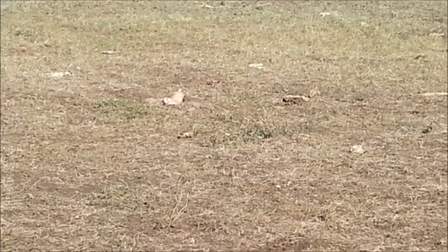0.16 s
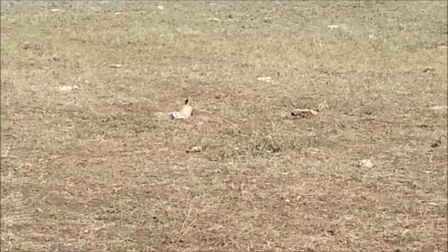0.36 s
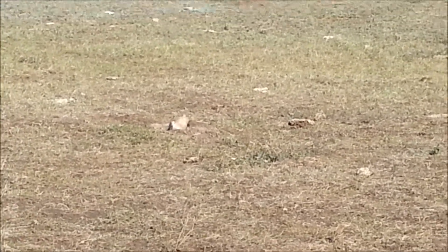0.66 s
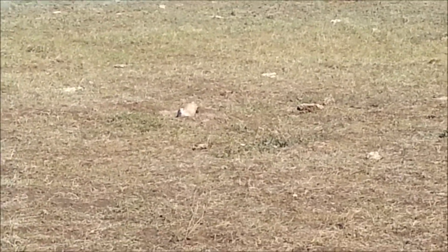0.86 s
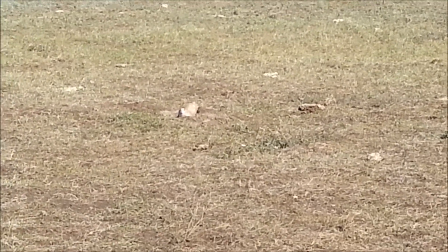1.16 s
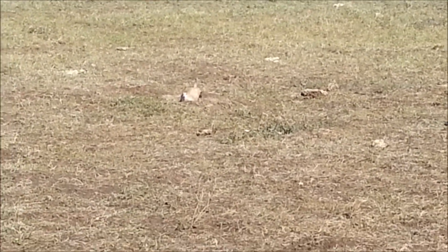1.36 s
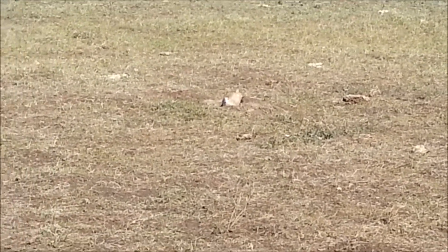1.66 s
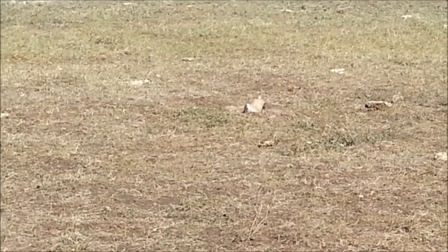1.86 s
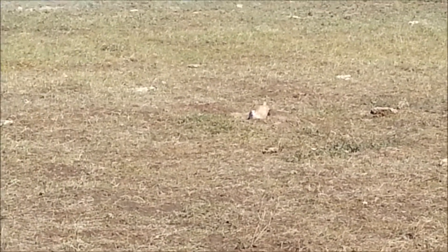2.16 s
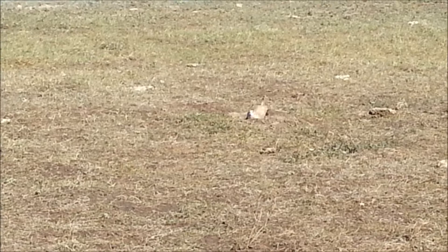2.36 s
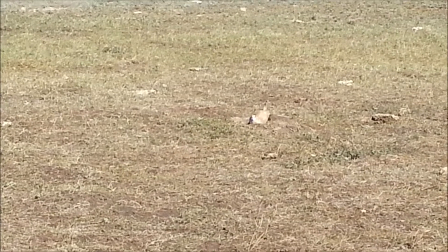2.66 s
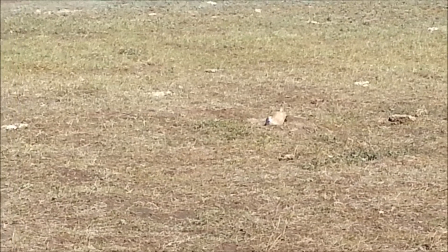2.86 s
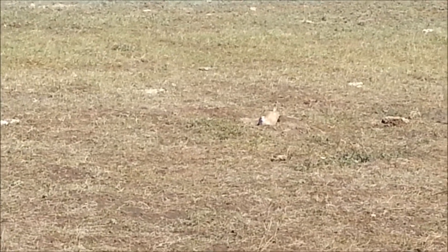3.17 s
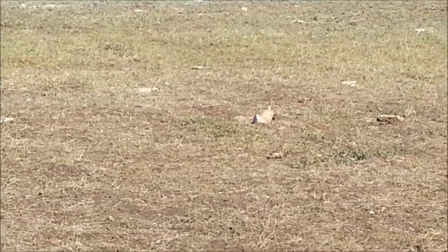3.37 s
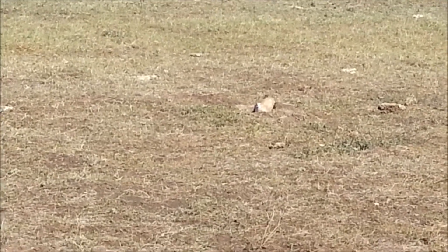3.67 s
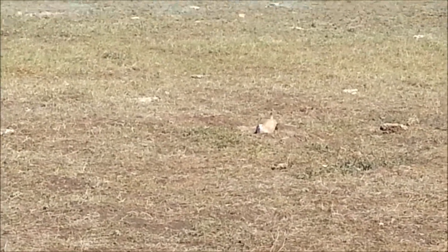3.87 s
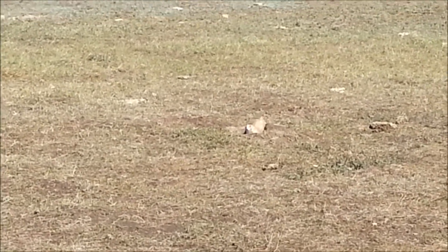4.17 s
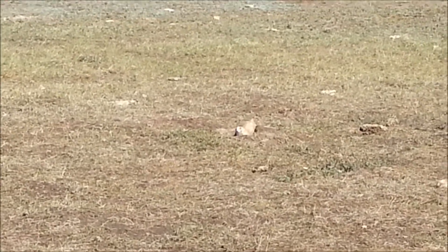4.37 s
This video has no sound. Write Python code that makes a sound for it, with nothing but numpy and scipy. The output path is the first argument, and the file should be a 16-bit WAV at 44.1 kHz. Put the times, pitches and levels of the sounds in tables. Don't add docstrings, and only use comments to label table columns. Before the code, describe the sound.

Faint, regular alarm barks from a distant prairie dog run the whole time. Over them come four loud, high barks from a nearer one, unevenly spaced, brighter on the left, cracking into a raspy double tone. The outdoor air is open and nearly echoless; wind puffs, plastic ticks from the hand-held device and light dry rustling surround the calls, over steady hiss.

```python
import sys
import numpy as np
from scipy import signal
from scipy.io import wavfile
from scipy.ndimage import uniform_filter1d

SR = 44100
rng = np.random.default_rng(int(sys.argv[2]) if len(sys.argv) > 2 else 0)


def volts(x):
    e = np.asarray(x, float) / 20
    return 10 ** e


def transcribe(signal):
    frames = np.atleast_2d(signal).T
    limited = np.clip(frames, -1, 1)
    pcm = np.round(limited * 32767).astype(np.int16)
    wavfile.write(sys.argv[1], SR, pcm)


N = 198869

# [f/Hz, level/dB]
HOUSING_SHADOW = [(900, -3.5), (1650, -5.5), (2000, -0.5), (3500, -12), (4000, -10.5), (6000, -16.5),
                  (9000, -2)]


def at_hz(points, hz):
    table = np.array(points)
    return np.interp(np.log(hz), np.log(table[:, 0]), table[:, 1])


def rms_one(x):
    return x / np.sqrt(np.mean(x ** 2) + 1e-20)


def drift(rate_hz, size):
    r = np.exp(-2 * np.pi * rate_hz / SR)
    run_in = int(SR / rate_hz)
    noise = rng.standard_normal(size + run_in)
    return rms_one(signal.lfilter([1], [1, -2 * r, r * r], noise)[run_in:])


def bandpass(x, low_hz, high_hz, order=2):
    return signal.sosfilt(signal.butter(order, [low_hz, high_hz], "band", fs=SR, output="sos"), x)


def span(rows):
    s, *columns = np.transpose(rows)
    at = np.arange(int(s[0] * SR), min(int(s[-1] * SR), N))
    return at, [uniform_filter1d(np.interp(at / SR, s, column), size=45) for column in columns]


def line(hz, level_db, shadow=HOUSING_SHADOW, turn=None):
    start_turn = rng.random() if turn is None else turn
    phase = 2 * np.pi * (np.cumsum(hz) / SR + start_turn)
    count = np.arange(len(hz))
    fade = np.minimum(1, np.minimum(count, count[::-1]) / 40)
    left = np.sin(phase)
    right = volts(at_hz(shadow, hz)) * np.sin(phase + 1.0 - 0.00017 * hz)
    return np.sqrt(2) * fade * volts(level_db) * np.array([left, right])


def banded_noise(spectrum, edges, patchy_db, rate):
    # [f/Hz, correlation 0-1]
    likeness = [(200, 0.086), (1200, 0.13), (4000, 0.016), (9000, 0.0075)]
    out, together = 0, drift(rate, N)
    white = rng.standard_normal((2, 2, N))
    for k, (low, high) in enumerate(zip(edges, edges[1:])):
        mid, side = bandpass(white[k % 2], low, high)
        hz = np.sqrt(low * high)
        alike = np.clip(at_hz(likeness, hz), 0, 1)
        flicker_db = patchy_db * (.7 * together + drift(rate, N))
        gain = volts(at_hz(spectrum, hz) + flicker_db)
        out = out + gain * (np.sqrt(1 + alike) * mid + np.sqrt(1 - alike) * side * [[1], [-1]])
    return rms_one(out)


def wind():
    # [t/s, left level/dB, right level/dB]
    gust = [(0.0, -62, -55.5), (0.35, -65.5, -59), (0.88, -55, -58), (2.46, -58.5, -61.5), (3.49, -54, -58),
            (4.51, -61, -59.5)]
    # [f/Hz, level per Hz/dB]
    left_colour = [(25, -32), (50, -46), (90, -4.5), (200, 3.5), (320, -5), (500, -13), (900, -61)]
    # [f/Hz, level per Hz/dB]
    right_colour = [(25, -10.5), (60, -9), (110, 2.5), (200, -9), (400, -11), (900, -32)]
    # [t/s, peak level/dB, f/Hz, length/ms]
    strong_puffs = [(.6696, -24, 298, 4.1), (.679, -22, 324, 4.2), (.6919, -32.5, 246, 16),
                    (.7315, -36, 292, 8), (.7475, -35, 273, 9.1), (.8193, -34.5, 243, 7),
                    (.8386, -32.5, 330, 4.2), (.9956, -39, 275, 2), (1.009, -27.5, 314, 5.8),
                    (1.0573, -26, 325, 6.7), (1.0722, -33, 265, 4.4), (1.0904, -35, 265, 7.5),
                    (1.1065, -33, 210, 6.7), (1.3014, -32, 300, 4.2), (1.3107, -29, 250, 7.3),
                    (1.5747, -34, 296, 4.4), (1.6535, -24.5, 420, 4.3), (1.7759, -32.5, 275, 7.4),
                    (1.9035, -31.5, 299, 3.7), (2.2153, -38.5, 248, 15), (2.3129, -33, 278, 7.2),
                    (2.9996, -33.5, 247, 4), (3.0149, -31.5, 226, 7), (3.3444, -36, 309, 4.9),
                    (3.3704, -31, 237, 4), (3.3793, -31, 258, 9.8), (3.3912, -27, 340, 3.7),
                    (3.3987, -28, 255, 9), (3.4175, -39.5, 305, 24), (3.8117, -33.5, 210, 10)]
    s, left_db, right_db = np.transpose(gust)
    t, edges = np.arange(N) / SR, 20 * 2 ** np.arange(0, 6, .5)
    left = volts(np.interp(t, s, left_db) + 5) * banded_noise(left_colour, edges, patchy_db=2.5, rate=25.0)[0]
    right = volts(np.interp(t, s, right_db)) * banded_noise(right_colour, edges, patchy_db=1.5, rate=15.0)[1]

    weak_puffs = []
    for chance, a, b in rng.random((26, 3)):
        when = .7 + 3.4 * chance
        peak_db = np.interp(when, s, left_db) + 15 + 4 * a
        weak_puffs.append((when, peak_db, 265 * (0.77 + 0.44 * b), 3.5))

    near, thumps = np.arange(-700, 700), np.zeros(N)
    for when, peak_db, hz, ms in [*strong_puffs, *weak_puffs]:
        bell = np.exp(-np.log(16) * (near / SR / (ms * 0.00068)) ** 2)
        cycle = np.cos(2 * np.pi * (hz * near / SR + rng.random()))
        thumps[int(when * SR) + near] += volts(peak_db) * bell * cycle
    thumps = signal.sosfilt(signal.butter(2, 90, "high", fs=SR, output="sos"), thumps)
    return np.array([left + thumps, right])


def air():
    # [f/Hz, level per Hz/dB]
    colour = [(290, -10), (500, -0.5), (990, -0.5), (1880, -3.5), (3370, -4.5), (6300, -14), (7060, -11),
              (14000, -10.5)]
    # [t/s, level/dB]
    bed = [(0.0, -62.5), (3.95, -61), (4.51, -62)]
    s, level_db = np.transpose(bed)
    hiss = banded_noise(colour, np.geomspace(350, 16000, 15), patchy_db=.3, rate=4.0)
    return volts(np.interp(np.arange(N) / SR, s, level_db) + 5.0) * hiss * volts([[.15], [-.15]])


def ticks():
    # [t/s, ring level/dB, ring
    # f/Hz, crack level/dB]
    knocks = [(0.0792, -52, 895, -59), (0.1193, -44, 900, -44), (0.293, -63, 1910, -37.5),
              (.5752, -41.5, 940, -48), (.9662, -55, 1240, -60), (0.9827, -49, 1720, -49),
              (.9934, -46, 1390, -36), (1.0418, -60, 1780, -49), (1.079, -54, 2200, -51),
              (1.094, -52, 1020, -31.5), (1.101, -47.5, 990, -43), (1.1402, -53, 2060, -43),
              (1.9223, -55, 990, -58), (1.9525, -52, 875, -56), (1.9862, -51, 860, -52),
              (2.0154, -53, 840, -61), (2.2313, -50, 930, -63), (2.5486, -44, 1260, -41),
              (2.7159, -67, 1550, -36), (2.9525, -47, 830, -36.5), (3.229, -50, 1020, -38),
              (3.2448, -33, 1025, -26.5), (3.2499, -42, 1050, -42), (3.2571, -31, 1070, -26),
              (3.2605, -44, 1030, -30), (3.3285, -56, 1220, -57), (4.0278, -59, 1900, -40),
              (4.311, -58, 1900, -36.5), (4.324, -54, 2500, -45), (4.447, -50, 730, -56)]
    out, t = np.zeros((2, N)), np.arange(900) / SR
    snap = bandpass(np.exp(-t / .00009), 1000, 4600, order=3)
    snap /= np.abs(snap).max()
    ring_shape = np.exp(-t / .002) * (1 - np.exp(-t / .0002))
    for when, ring_db, hz, crack_db in knocks:
        pan_db = 8 * np.log2(hz / 850)
        turn = 2 * np.pi * hz * t
        ring = np.sin(turn) - 0.39 * np.sin(1.67 * turn) + 0.37 * np.sin(0.71 * turn)
        at = slice(int(when * SR), int(when * SR) + 900)
        out[:, at] += volts(ring_db + 5.5) * ring * ring_shape * volts([[pan_db / 2], [-pan_db / 2]])
        out[:, at] += volts(crack_db - 1) * snap * volts([[0], [-7]])
    return out


def far_calls():
    # [start t/s, top of 2nd partial f/Hz, its level/dB, fundamental level/dB,
    #            second oscillator re each/dB]
    calls = [(.092, 3090, -53, -57, -3), (.478, 3080, -54, -58, -8), (.841, 3110, -51, -56, -2),
             (1.227, 3150, -52, -56, -4), (1.586, 3110, -51, -57, -2), (1.962, 3010, -54, -61, -14),
             (2.36, 2900, -60, -66, -14), (2.721, 3090, -53, -57, -4), (3.058, 3110, -50, -57, -4),
             (3.462, 3200, -47, -56, -3), (3.851, 2970, -50, -62, -18), (4.226, 3130, -51, -58, -4)]
    # [share of length, pitch re top, level/dB]
    arch = [(0, .92, -16), (.12, .97, -5), (.28, 1.0, -1), (.55, .965, -3.5), (.85, .91, -6), (1, .88, -18)]
    # [f/Hz, level/dB]
    far_shadow = [(1500, -5), (3000, -7)]
    out, length_s = np.zeros((2, N)), .043
    part, pitch, swell_db = np.transpose(arch)
    for start, top_hz, top_db, low_db, beat_db in calls:
        at, (hz, shape_db) = span(np.transpose([start + length_s * part, top_hz * pitch, swell_db]))
        size = len(at)
        share = np.clip(np.linspace(-1.2, 3.5, size), 0, 1) * np.clip(np.linspace(5.0, 0, size), 0, 1)
        hz = hz * (1 + .01 * drift(250, size))
        beat = 350 * (1 + .08 * drift(80, size))
        for tone_hz, tone_db in ((hz, top_db + shape_db), (hz / 2, low_db + 0.5 + shape_db)):
            second_db = tone_db + beat_db + 3.0 * drift(120, size)
            out[:, at] += line(tone_hz, tone_db + 2.5 * drift(120, size), far_shadow)
            out[:, at] += share * line(tone_hz + beat, second_db, far_shadow)
    return out


def bark_controls(start, length, top_hz, level_db, breaks, end_hz, bend, burst):
    # [f/Hz, level/dB]
    mouth = [(1880, -38), (2040, -27.5), (3500, -28), (4030, -27.5), (4200, -40.5), (5450, -60),
             (5850, -31.5), (6100, -30)]
    split_loss_db = [2, 0, 0]
    tail_s = .008
    at = np.arange(int(start * SR), int((start + length + tail_s) * SR))
    t, top = at / SR - start, .62 * breaks

    set_in_hz = 1775
    rise = set_in_hz + (top_hz - set_in_hz) * np.sin(np.pi / 2 * np.clip(t / top, 0, 1))
    hz = rise - (top_hz - end_hz) * np.clip((t - top) / (length - top), 0, 1) ** bend

    onset_db = -24 * np.clip(1 - t / .0022, 0, 1) ** 2
    swell_db = 5.5 * (t / length - .5)
    surge_db = 1.5 * np.exp(-np.abs(length - t) / 0.0031)
    release_db = 4600 * np.maximum(t - length, 0)
    effort_db = level_db + onset_db + swell_db + surge_db - release_db

    settling = burst * (.45 + (1 - .45) * np.exp(-np.maximum(t - breaks, 0) / .012))
    share = np.clip((t - breaks) / .002 + 1, 0.088, 1) * settling
    levels_db = [effort_db + at_hz(mouth, (k + 1) * hz) - loss_db * share
                 for k, loss_db in enumerate(split_loss_db)]
    return at, (hz, *levels_db, share)


def near_barks():
    # [start t/s, length/s, top pitch f/Hz, level/dB, voice break after start t/s]
    barks = [
        (.5203, .0440, 2090, -1.5, .0247),
        (1.4843, .0435, 2040, 1.2, .0262),
        (2.3078, .0420, 1980, -.3, .0197),
        (3.7193, .0410, 1960, 0, .0172),
    ]
    # [oscillator gap f/Hz, end pitch f/Hz, bend of the sag, second oscillator share 0-1]
    voices = [(330, 1740, 1.8, .5), (361, 1700, 1.2, .9), (359, 1730, 1.1, .8), (340, 1710, 1.05, .8)]
    partial_turn = [0, .63, .86]
    # [partial number, level re a base that follows the 3rd partial only weakly/dB]
    upper = [(4, -22.5), (5, -32), (6, -34.5), (7, -49)]
    # [partial number, beat multiple, level re that partial/dB]
    side_lines = [(1, 1, -5.5), (1, -1, -10.5), (2, 1, -8.5), (2, -1, -15), (2, 2, -19), (2, -2, -23.5),
                  (3, 1, 1), (3, -1, -16), (3, 2, -50), (3, 3, -12.5)]
    out = np.zeros((2, N))
    for bark, (beat_hz, *voice) in zip(barks, voices):
        at, (hz, *levels_db, share) = bark_controls(*bark, *voice)
        size = len(at)
        share = np.clip(share, 1e-3, 1)
        hz = hz * (1 + .009 * share * drift(300, size))
        beat = beat_hz * (1 + .07 * drift(70, size))
        for k, level_db in enumerate(levels_db):
            wobble_db = 1.5 * share * drift(300, size)
            out[:, at] += line((k + 1) * hz, level_db + wobble_db, turn=partial_turn[k])
        for k, rel_db in upper:
            shaky = 1 + (.008 * (k - 3.5) + .035 * share) * drift(400, size)
            upper_db = 0.21 * levels_db[2] - 22.5 + rel_db + 2.4 * drift(78, size)
            out[:, at] += line(k * hz * shaky, upper_db)

        held = [levels_db[0], levels_db[1], np.maximum(levels_db[2], levels_db[1] - 8)]
        for k, m, rel_db in side_lines:
            side_db = held[k - 1] + rel_db + 2.5 * drift(150, size)
            out[:, at] += share * line(k * hz + m * beat, side_db)

        noise = rng.standard_normal((2, size))
        rasp = bandpass(noise, 2800, 8200)
        breath = bandpass(noise, 9500, 14500)
        breath_db = levels_db[1] - 17.5 + 2 * drift(80, size)
        out[:, at] += share * volts(levels_db[1] - 17) * rasp * volts([[0], [-8]])
        out[:, at] += share * volts(breath_db) * breath * volts([[0], [-6]])
    return out


def indrawn_notes():
    # [start t/s, length/s, pitch f/Hz, fundamental level/dB, throat level/dB]
    notes_in = [
        (.570, .02, 940, -49, -86),
        (1.537, .025, 970, -45, -76),
        (1.602, .02, 960, -49, -90),
        (2.36, .03, 980, -43, -71),
        (3.773, .014, 930, -49, -90),
        (3.817, .022, 960, -54, -86),
    ]
    # [partial number, level/dB]
    throat = [(3, 1), (4, -5), (5, 3), (7, -7)]
    out = np.zeros((2, N))
    for start, length, note_hz, note_db, rasp_db in notes_in:
        t = length * np.array([0, .3, 1])
        at, (hz, shape_db) = span(np.transpose([start + t, note_hz - 2500 * t, [-6, 0, -15]]))
        size = len(at)
        out[:, at] += line(hz * (1 + .015 * drift(200, size)), note_db + shape_db + 1)
        for k, rel_db in throat:
            shaky = 1 + .045 * drift(250, size)
            throat_db = rasp_db + shape_db + 14 + rel_db + 1.3 * drift(230, size)
            out[:, at] += line(k * hz * shaky, throat_db)
    return out


def distant_whistles():
    # [t/s, f/Hz, level/dB]
    glides = [
        [(.628, 1350, -68), (.64, 1100, -60), (.656, 800, -67)],
        [(4.39, 1550, -78), (4.41, 1750, -67), (4.435, 2080, -68), (4.48, 2130, -66), (4.51, 2050, -70)],
    ]
    # [f/Hz, level/dB]
    whistle_shadow = [(800, 8), (2000, -6)]
    out = np.zeros((2, N))
    for rows in glides:
        at, (hz, level_db) = span(rows)
        out[:, at] += line(hz, level_db + 2.5 * drift(60, len(at)), whistle_shadow)
    return out


def rustle():
    # [t/s, hold/s, level/dB]
    strokes = [
        (.985, .115, -55),
        (3.262, .048, -55.5),
        (3.39, .02, -61),
        (4.325, .003, -61),
    ]
    # [f/Hz, level per Hz/dB]
    grass = [(700, 4), (1500, -0.5), (3500, -2.5), (5000, -11), (7000, -20)]
    sizes = volts(2.5 * np.minimum(rng.exponential(1, N), 4)) * rng.choice([-1, 1], N)
    born = rng.random(N) < 3000 / SR
    stem = rng.integers(0, 16, N)
    grains = np.zeros(N)
    for k, hz in enumerate(np.geomspace(800, 7000, 16)):
        r, w = volts(-60 * hz / (9.0 * SR)), 2 * np.pi * hz / SR
        hits = sizes * born * (stem == k) + 1e-18
        ring = signal.lfilter([0, np.sin(w)], [1, -2 * r * np.cos(w), r * r], hits)
        grains += volts(at_hz(grass, hz)) * np.sqrt(hz) * rms_one(ring)
    grains, out = rms_one(grains), np.zeros(N)
    for s, hold, db in strokes:
        edge_db = db - 15
        at, (level_db,) = span([(s - .025, edge_db), (s, db), (s + hold, db), (s + hold + .05, edge_db)])
        out[at] += volts(level_db + 1.5 * drift(60, len(at))) * grains[at]
    return out * volts([[2.5], [-3]])


def ground(x):
    # [delay t/s, level/dB]
    echoes = [(.0042, -29), (.0075, -37), (.013, -43), (.023, -56)]
    dull = signal.lfilter([.5], [1, -.5], x)
    return x + sum(volts(db) * np.roll(dull, int(s * SR), axis=1) for s, db in echoes)


def scene():
    voices = far_calls() + near_barks() + indrawn_notes() + distant_whistles()
    return wind() + air() + ticks() + ground(voices) + rustle()


def roll_off(x):
    return signal.sosfilt(signal.butter(12, 15490, fs=SR, output="sos"), x)


def record(dry):
    cut = signal.sosfilt(signal.ellip(14, .3, 80, 14620, fs=SR, output="sos"), dry)
    return roll_off(cut)


dry = scene()
out = record(dry)
transcribe(out)
```